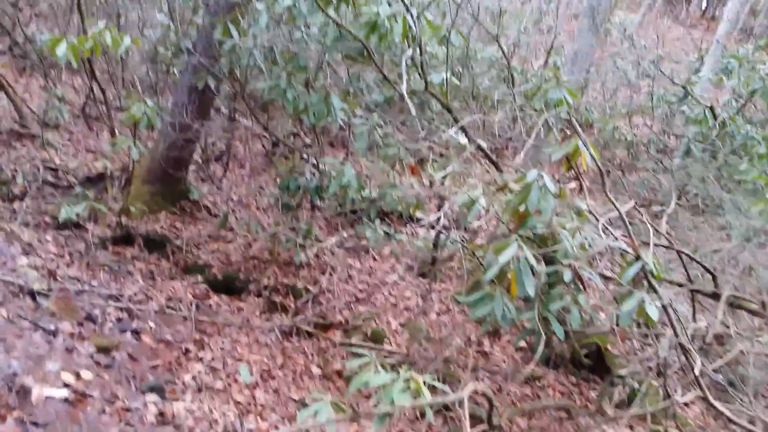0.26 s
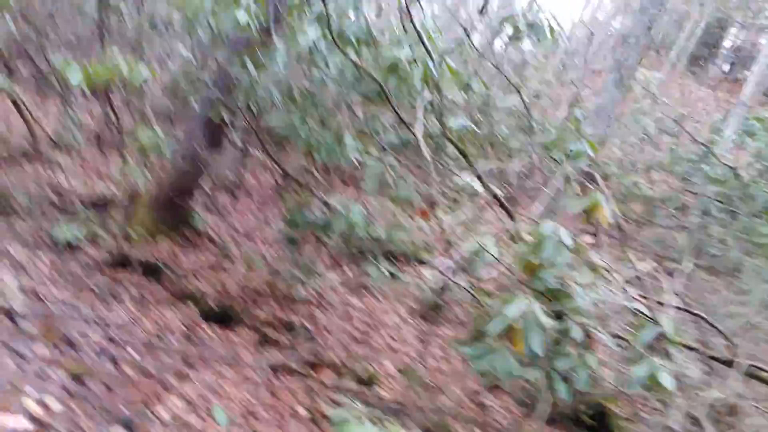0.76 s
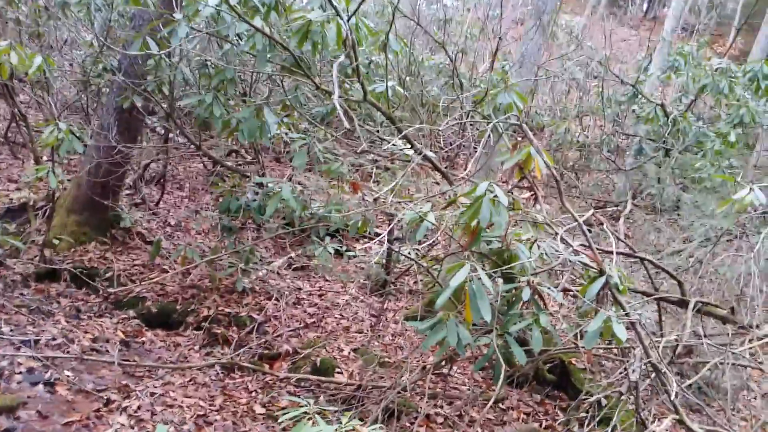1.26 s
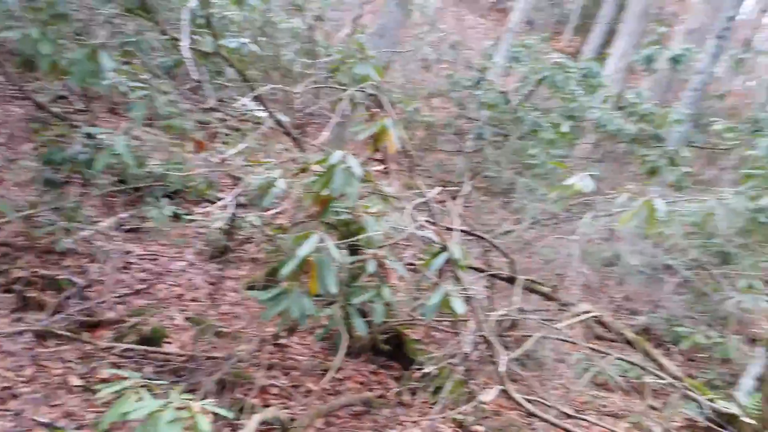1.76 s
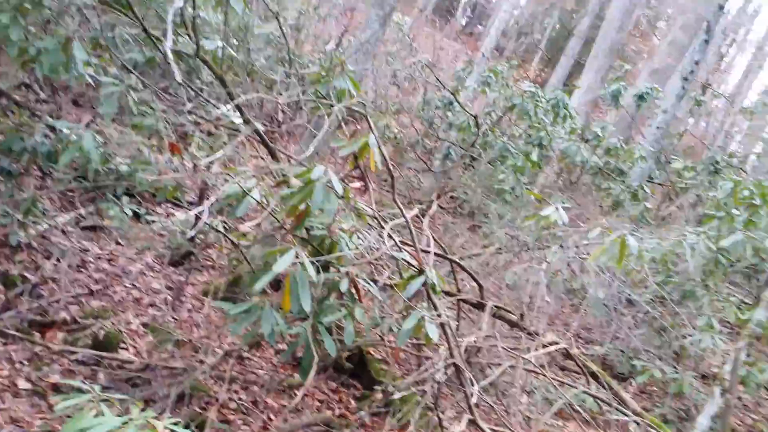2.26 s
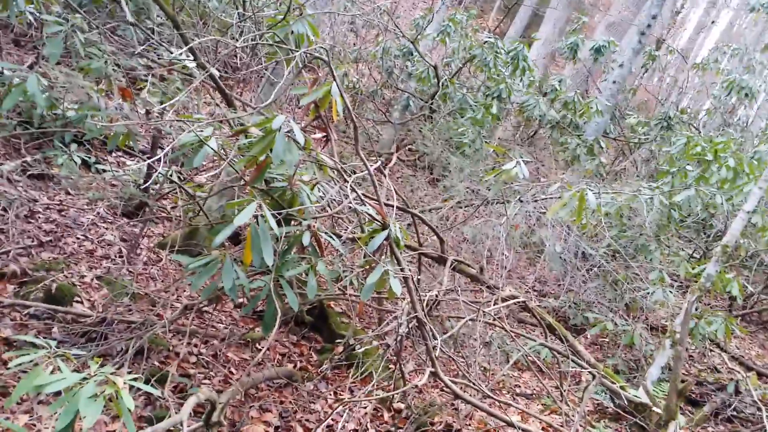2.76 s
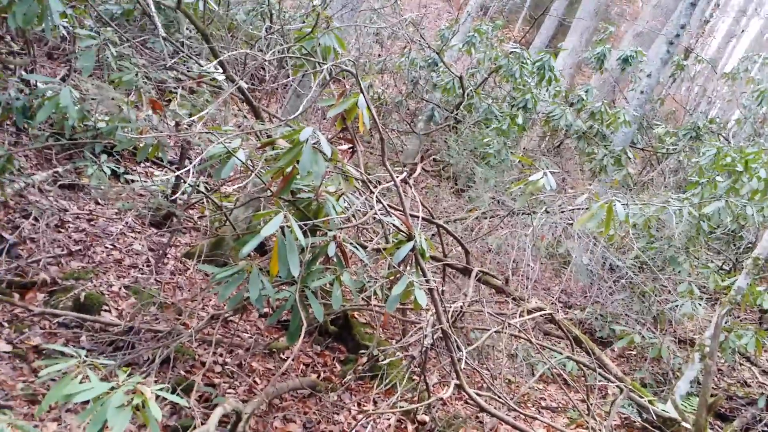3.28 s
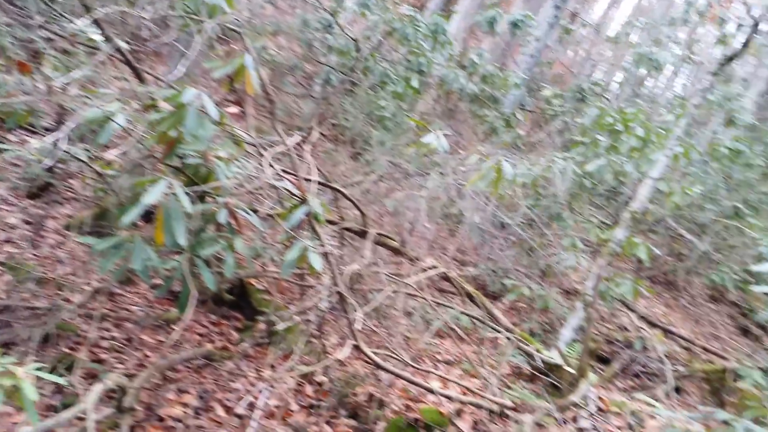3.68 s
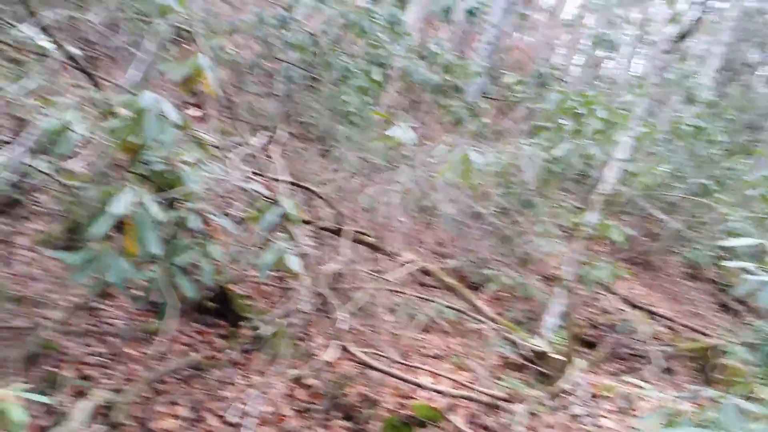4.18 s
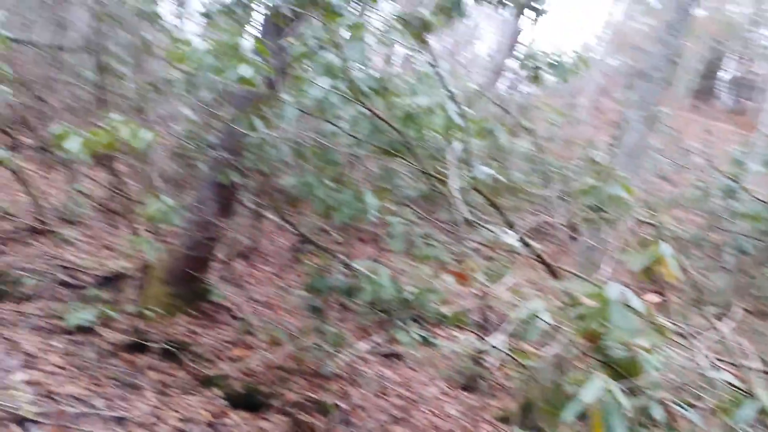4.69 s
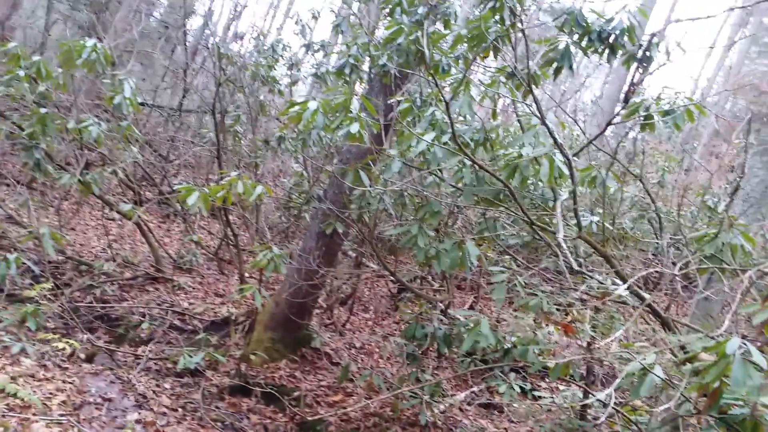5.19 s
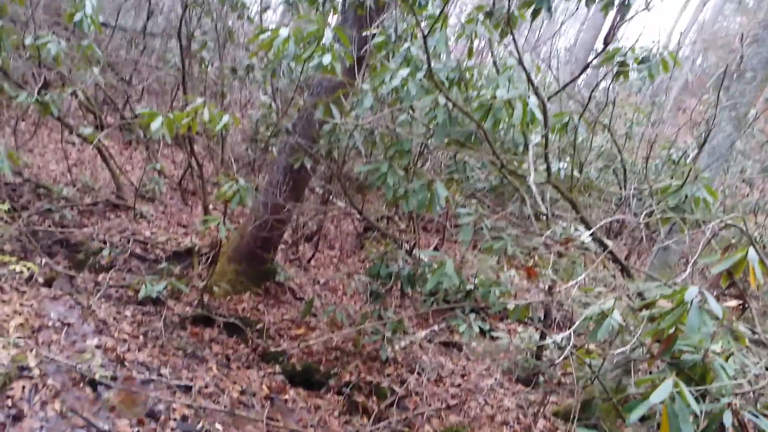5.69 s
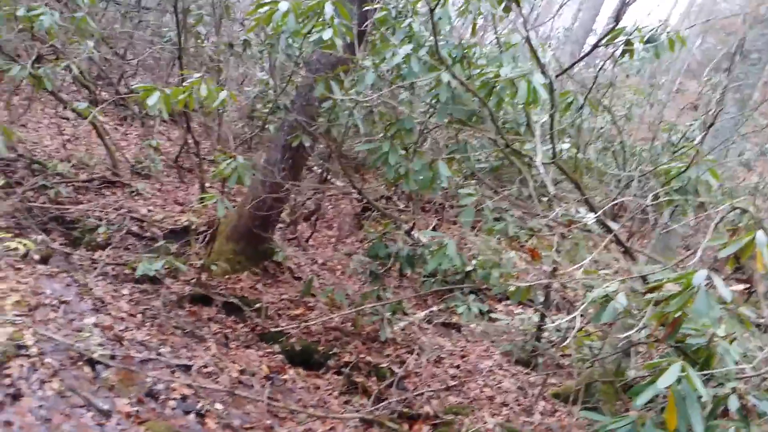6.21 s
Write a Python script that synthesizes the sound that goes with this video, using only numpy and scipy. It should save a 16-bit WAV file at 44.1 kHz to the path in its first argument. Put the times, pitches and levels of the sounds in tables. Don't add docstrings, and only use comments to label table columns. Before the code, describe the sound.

Dry leaves swish and crunch underfoot as twigs snap, three thick sticks crack loudly, and a faint aircraft drone swells late over soft hiss.

```python
import sys
import numpy as np
from scipy import signal
from scipy.fft import rfft, irfft, next_fast_len
from scipy.io import wavfile
from scipy.ndimage import uniform_filter1d, map_coordinates

SR = 44100
rng = np.random.default_rng(int(sys.argv[2]) if len(sys.argv) > 2 else 0)


def generate_wav(sig):
    pcm = np.round(np.clip(np.atleast_2d(sig).T, -1, 1) * 32767).astype(np.int16)
    wavfile.write(sys.argv[1], SR, pcm)


def to_linear_factor(level_db):
    exponent = np.asarray(level_db, float) / 20
    return 10 ** exponent


N = 284451

# freq_hz, density_db
HISS_LEFT = [(300, -8), (800, -13), (2200, -15.5), (4500, -17.5), (6000, -8.5), (7300, 0.5), (8500, -7),
             (10000, -8.5), (12000, -17.5), (15400, -16), (15900, -60)]
HISS_RIGHT = [(300, -3.5), (800, -5.5), (1500, -10), (2200, -11.5), (4500, -13), (6200, -22), (8500, -10.5),
              (10500, -16.5), (15400, -15), (15900, -66)]
# time_s, level_db, upper_drone_tilt_db, middle_drone_lean_db
DRONE = [(0.0, -49.5, 2.5, 0.5), (0.3, -45.5, -6, 5), (0.56, -47, 1, -1), (0.8, -53.5, 1.5, 6),
         (1.15, -63, 11, -0.5), (1.3, -56, 7, -2), (1.5, -61.5, 4, 4), (1.8, -58.5, 3.5, 0),
         (2.5, -62, 1, -1.5), (3.0, -57.5, -4.5, 4.5), (3.45, -53.5, -3, -3), (3.9, -57.5, -1.5, -0.5),
         (4.3, -54.5, -0.5, -1), (4.85, -53.5, 2, -4.5), (5.05, -48, -5.5, -13.5), (5.55, -42, -9, -1.5),
         (5.85, -43.5, -8.5, -6), (6.25, -47, 0.5, -8.5)]
# freq_hz, density_db
LOW_DRONE = [(35, -46), (60, -44), (102, 0.5), (124, 2.5), (145, -2.5), (190, -23.5), (300, -120)]
MID_DRONE = [(80, -62), (125, -20), (150, -2), (180, 0), (264, -19.5), (300, -13.5), (390, -53),
             (660, -120)]
HIGH_DRONE = [(130, -19), (220, 3.5), (242, 1), (270, -8.5), (301, 1), (325, 1), (350, -1.5), (404, -12.5),
              (454, -7), (520, -19.5), (900, -29), (1170, -54), (1980, -120)]
# freq_hz, density_db
GROUND_THUD = [(20, -45), (38, -13), (55, 6), (85, 15.5), (110, -36)]
# start_s, level_db
THUMPS = [
    (0.43, -66),
    (0.79, -41.5),
    (4.83, -55),
    (5.03, -46.5),
    (5.69, -60),
    (5.89, -60),
    (6.11, -64),
]
# start_s, peak_db, pitch_hz
KNOCKS = [(0.024, -14.5, 342), (0.0235, -20, 562), (0.622, -30.5, 268), (0.993, -35, 470),
          (2.204, -32.5, 700), (2.4245, -21.5, 780), (3.182, -46, 248), (3.299, -26, 456), (3.43, -42, 250),
          (3.491, -40, 335), (4.344, -60, 301), (5.084, -34.5, 316), (5.4152, -45, 1090), (5.527, -32, 252)]
# start_s, peak_db, pitch_hz
TICKS = [(0.161, -52, 1370), (0.226, -47, 1020), (1.554, -51, 1300), (1.651, -46, 1170),
         (1.3237, -36, 4590), (2.5466, -57, 5400), (2.574, -51.5, 3000), (2.6579, -55, 1980),
         (2.7624, -56, 4880), (2.795, -61, 2540), (2.983, -54.5, 2920), (3.0214, -59, 834),
         (3.0657, -56, 3840), (3.1248, -52, 2290), (3.1832, -57, 1230), (3.222, -56, 2880),
         (3.359, -47, 8500), (3.414, -57, 1100), (3.466, -57, 3720), (3.488, -49, 1150),
         (3.6004, -69, 1660), (3.6894, -56, 5370), (3.8504, -65, 1030), (3.888, -58, 2860),
         (4.341, -54, 1260), (4.9541, -60, 1020), (5.0664, -63, 912), (5.081, -48, 970), (5.675, -53, 1970),
         (6.354, -56, 4570)]
# start_s, peak_db, centre_hz, left_right_db
POPS = [(0.053, -33, 895, 5), (0.081, -36, 895, 2), (0.1108, -33.5, 910, 4), (0.195, -35, 7500, 4),
        (0.207, -39, 1500, 2), (0.3561, -48, 5000, 1), (0.5352, -58, 4000, 1), (0.622, -40.5, 934, 3),
        (0.6764, -44, 1500, 2.5), (0.6898, -34, 5000, 2.5), (0.711, -33, 5530, 3.5), (0.728, -31, 5600, 3),
        (0.765, -37, 1500, 10), (0.9238, -37.5, 1460, 2), (0.931, -39.5, 1410, 4), (0.948, -46, 1000, 4),
        (0.9926, -35, 6200, 2.5), (1.0565, -43, 964, -1), (1.1185, -36, 690, -3), (1.2216, -40, 1290, 4.5),
        (1.2235, -43, 4700, 4), (1.251, -43, 1600, 1), (1.312, -44, 4500, 3), (1.336, -39, 1100, 11),
        (1.362, -46, 1100, 5), (1.784, -36, 2000, 0), (1.785, -37, 1100, 5), (1.805, -37, 8000, 3),
        (1.835, -37.5, 800, 5), (1.8636, -29, 8750, 1), (1.8645, -31, 2180, 8), (1.866, -37, 12500, 3),
        (1.878, -45, 2000, 3), (1.935, -47, 2500, 3), (1.919, -32, 3890, 4), (4.772, -39, 4830, -2),
        (4.772, -49, 12000, 2), (5.4145, -38, 10000, 1), (5.421, -24, 4500, 3), (5.651, -48, 900, -3),
        (5.828, -45, 1300, 1), (5.837, -38.5, 600, 0), (6.071, -43, 1500, 2), (6.126, -43, 8500, 2),
        (1.952, -25.5, 13200, 13), (5.422, -22, 9500, -2), (5.4705, -30.5, 3200, 4),
        (6.108, -33.5, 4800, 3), (4.708, -40, 4000, 0), (2.204, -45, 1300, 4)]
# start_s, peak_db, centre_hz, left_right_db
SPECKS = [(0.163, -47, 3500, 3), (0.187, -44, 9000, 3), (0.202, -43, 4000, 3), (0.229, -41, 6000, 3),
          (0.059, -35, 10000, 3), (0.12, -36, 11000, 3), (0.901, -44, 8000, 3), (1.095, -44, 9000, 3),
          (1.327, -35, 7500, 4), (1.331, -41, 4600, 4), (1.832, -40, 13000, 3), (1.832, -38, 6000, 3),
          (1.838, -33, 4500, 3), (1.798, -37, 5000, 3), (2.012, -55, 1300, 2), (2.038, -54, 1200, 2),
          (2.054, -50, 2500, 2), (2.075, -47, 5000, 4), (2.115, -50, 5000, 2), (2.277, -50, 3000, 2),
          (2.665, -49, 2600, 2), (2.733, -47, 4800, 3), (2.796, -56, 1950, 2), (3.075, -52, 745, 1),
          (3.135, -53, 1300, 2), (3.214, -52, 3300, 2), (3.503, -48, 1290, 2), (3.571, -49, 3800, 2),
          (4.437, -56, 1200, 1), (4.688, -50, 2000, -2), (4.709, -44, 900, -2), (4.716, -50, 4500, 0),
          (4.955, -49, 2500, -2), (5.427, -29, 11000, 0), (5.433, -33, 9000, -3), (5.534, -44, 2900, 0),
          (5.684, -52, 2500, 1), (5.69, -49, 2050, 1), (5.743, -50, 1250, 1), (5.813, -52, 3000, -5),
          (6.019, -45, 3100, 2), (6.047, -38.5, 1100, 2), (6.06, -43, 3200, 2), (6.125, -46, 5500, 2),
          (6.235, -39, 3200, 2), (6.288, -45, 3000, 2), (6.355, -39, 3600, 3), (6.315, -43, 4500, 2),
          (0.0235, -30, 1080, 3), (0.1115, -23, 13500, 0)]
# start_s, held_s, pressure_db, dryness_db
PRESSES = [(0.0, 0.019, -38, -2), (0.07, 0.14, -47, -7), (0.27, 0.14, -57, -9), (0.39, 0.22, -53, -9.5),
           (0.71, 0.021, -39, 1), (0.8, 0.1, -49.5, -7.5), (0.935, 0.26, -49, -5.5),
           (1.22, 0.14, -48.5, -3.5), (1.5, 0.095, -59.5, -5), (1.677, 0.046, -46.5, -4),
           (1.808, 0.0098, -43.5, -0.5), (1.87, 0.12, -54, -2.5), (2.06, 0.21, -64.5, -9),
           (2.26, 0.087, -61.5, -12.5), (2.36, 0.31, -67, -9), (2.75, 0.072, -64.5, -3),
           (3.38, 0.16, -60.5, -4.5), (3.6, 0.79, -71, -16), (4.69, .02, -59, -7), (4.9, 0.86, -66.5, -9),
           (5.49, 0.015, -61.5, 9), (5.56, 0.36, -63.5, -5), (6.0, 0.031, -53, -18.5),
           (6.04, 0.046, -46, -8.5), (6.13, 0.15, -54, -6), (6.25, 0.16, -52.5, -9)]
# freq_hz, density_db
LEAF_BODY = [(250, -18), (600, -6.5), (1200, -2), (2200, -5.5), (3500, -5), (4800, -5.5), (7000, -19.5)]
LEAF_EDGE = [(3500, -5), (5400, -0.5), (7600, 3.5), (10000, -0.5), (13000, -5), (15400, -5), (15900, -43)]
MOULD = [(250, -10), (500, 10.5), (1200, 1), (2500, -14), (4500, -41)]
# freq_hz, gain_db
FLICK_BAND = [(300, -20), (600, 0), (15300, 0), (15800, -50)]
# freq_hz, level_db, t60_s
BRUSH = [(400, 13, 0.072), (2110, 15.5, 0.029), (7630, -2, 0.14), (14000, 6.5, 0.14), (15800, 8, 0.093),
         (15900, -9, .05)]
# time_s, left_port_lag_ms
BEARING = [(0, 0), (1.1, -.16), (1.44, .06), (1.78, -.25), (2.43, -.2), (3.3, .04), (4.7, .28), (5.3, .25),
           (5.42, .08), (5.46, -.1), (5.84, -.09)]
# start_s, peak_db, pitch_hz, left_right_db
BRITTLE = [(0.053, -51, 6000, 0.0), (0.062, -31, 7850, -16), (0.0764, -28.5, 8000, 13),
           (0.108, -32, 9000, -15), (0.111, -23.5, 7440, 11), (0.1185, -38, 5200, -9),
           (0.8784, -45, 1400, 0), (0.924, -36, 7200, -11.5), (0.9924, -36, 574, -5),
           (1.085, -39.5, 1380, 5), (1.678, -36, 7450, 1), (1.7035, -32, 3520, 11), (1.783, -20.5, 6840, 8),
           (1.8644, -24.5, 3900, 9.5), (1.8695, -24, 3660, 5), (1.9176, -30.5, 7460, 10),
           (2.1301, -44, 6960, 12), (3.4274, -44, 2470, -1), (3.57, -40, 7360, 9), (4.3882, -47, 7400, -3),
           (4.6861, -46, 4800, -4), (4.7076, -41, 3000, -6)]
# start_s, peak_db, pitch_hz, left_right_db
DAMP = [(0.0228, -19.5, 4600, 10), (0.8106, -30, 8020, 4), (1.1179, -24, 5300, 9.5), (1.243, -30, 1280, 6),
        (1.3237, -37, 4800, 16), (1.8092, -21, 2500, 4.5), (2.004, -38, 3800, 2), (2.2035, -35.5, 4230, 8),
        (2.6217, -44, 7400, 2), (2.732, -45, 7560, 13), (3.1219, -46, 2350, 2), (4.4254, -40, 6850, 3),
        (4.771, -31.5, 1520, 2.5), (5.5314, -40.5, 1800, -1), (6.1074, -36, 4600, 13),
        (6.1644, -38, 4800, 3), (6.2342, -44, 1330, -4), (6.355, -37, 4700, 12)]
# start_s, peak_db, left_right_db, scatter_db, suddenness (first break over tearing)
STICKS = [
    (1.4416, -5, 3.5, -14.5, 7.2),
    (1.952, -18.5, 4, -8.5, 6.2),
    (2.4233, -25, 5, -20, 13),
    (3.2961, -7.5, 7.5, -12, 3.8),
    (5.416, -8.5, 1.5, -14, 6.5),
    (5.469, -16.5, 0, -8, 2.3),
    (5.836, -23.5, 3.5, -17, 6.5),
]
# freq_hz, density_db
STICK_VOICES = [
    [(150, -45), (250, -13.5), (1300, -13), (1800, -5.5), (3350, 1.5), (4670, -13), (7900, 0.5),
     (10600, -17), (15100, -8.5), (16500, -21)],
    [(240, -42), (400, -18), (971, 1), (1900, -8), (4070, -0.5), (8720, -6.5), (11000, -22), (13700, -20),
     (16500, -27)],
    [(150, -27), (350, 2), (700, -8), (1100, -22), (1600, -1), (2300, -17), (3900, -7.5), (5500, -25),
     (7900, -26), (16500, -60)],
    [(150, -40), (250, -6), (600, -8), (1020, -5.5), (2650, -12.5), (5760, -12), (7240, -4), (9500, -0.5),
     (11600, 1), (14900, -9), (16500, -32)],
    [(180, -38), (500, -8), (1450, 0), (3710, -7.5), (5500, -9.5), (7630, 1), (9490, -22), (13000, -12),
     (16500, -32)],
    [(180, -37), (300, -1.5), (650, 1), (1000, -5), (1450, -4), (3300, -21), (6560, -7), (13000, -25),
     (15400, -17), (16500, -50)],
    [(240, -36), (800, -12), (1390, -3.5), (4400, -19), (5600, -19), (7010, -6.5), (12500, -29),
     (13900, -10), (16500, -39)],
]
# freq_hz, gain_db
LEFT_PORT = [(4500, 0), (5800, 0.5), (7200, 1.5), (9200, -3.5), (12000, 0.5), (14500, 0.5)]
# freq_hz, gain_db
PASS_BAND = [(22, -18), (45, 0), (15400, 0), (15800, -15), (16500, -24), (16800, -60)]

PRESS_RISE_DB_S, PRESS_FALL_DB_S, REST_DB, REST_EDGE_DB = 361, 239, -69.5, -74
DEBRIS_DB, DEBRIS_EDGE_DB, DEBRIS_LATE_S = -53, -33, 0.002
DEBRIS_RISE_DB_S, DEBRIS_FALL_DB_S, DEBRIS_GROWS = 12000, 304, 1.3
MOULD_DB, MOULD_PER_DRY = -14.5, -0.79


def along(points, hz):
    f, v = np.transpose(points)
    return np.interp(np.log(hz + 1), np.log(f + 1), v)


def unit(x):
    return x / np.sqrt(np.mean(x ** 2) + 1e-20)


def curves(rows):
    s, *cols = np.transpose(rows)
    return [np.interp(np.arange(N) / SR, s, c) for c in cols]


def wobble(rate_hz):
    return map_coordinates(rng.standard_normal(int(N * rate_hz / SR) + 4), [np.arange(N) * rate_hz / SR])


def coloured(x, spectrum):
    m = next_fast_len(N + 8192)
    gain = to_linear_factor(along(spectrum, np.fft.rfftfreq(m, 1 / SR)))
    return unit(irfft(rfft(x, m) * gain, m)[..., :N])


def pair(alike):
    a, b = rng.standard_normal((2, N))
    turn = np.arccos(np.clip(alike, -1, 1)) / 2
    return np.array([np.cos(turn) * a + np.sin(turn) * b, np.cos(turn) * a - np.sin(turn) * b])


def band(x, lo_hz, hi_hz):
    y = signal.sosfilt(signal.butter(2, [lo_hz, hi_hz], "band", fs=SR, output="sos"), x)
    return y / np.abs(y).max()


def add(track, s, sound):
    start = round(s * SR)
    track[..., start:start + sound.shape[-1]] += sound


def sides(left_right_db):
    return np.array([[left_right_db / 2], [-left_right_db / 2]])


def fringed(x, depth_db, size=4096):
    z = signal.stft(x, nperseg=size)[2]
    field = uniform_filter1d(rng.standard_normal(z.shape[1:]), size=3, axis=0)
    field = uniform_filter1d(field, size=5, axis=1)
    return signal.istft(z * to_linear_factor(depth_db * unit(field)), nperseg=size)[1][:, :N]


def swell(start, held, db, rise_db_s, fall_db_s):
    t = np.arange(0, N + 32, 32) / SR
    rise = rise_db_s * np.maximum(start - t, 0)
    fall = fall_db_s * np.maximum(t - start - held, 0)
    return to_linear_factor(2 * (db - rise - fall))


def level(power):
    return np.sqrt(np.interp(np.arange(N) / 32, np.arange(len(power)), power))


def hiss():
    stir_db = -55.5 + 0.24 * (curves(DRONE)[0] + 55)
    left = to_linear_factor(stir_db) * coloured(rng.standard_normal(N), HISS_LEFT)
    right = to_linear_factor(-62) * coloured(rng.standard_normal(N), HISS_RIGHT)
    return np.array([left, right])


def aircraft():
    low_db, tilt_db, lean_db = curves(DRONE)
    air = fringed(pair(0.98), depth_db=2.0)
    low = coloured(air, LOW_DRONE) + to_linear_factor(lean_db) * coloured(air, MID_DRONE)
    low = to_linear_factor(low_db + 1.96 * wobble(6.4)) * low
    high = coloured(fringed(pair(0.88), depth_db=2.5), HIGH_DRONE)
    high = to_linear_factor(low_db + tilt_db + 1.87 * wobble(11)) * high
    rumble = to_linear_factor(low_db - 15.5) * coloured(pair(0.94), GROUND_THUD)
    return low + high + rumble


def thumps():
    power = sum(swell(s, 0, db, rise_db_s=118, fall_db_s=118) for s, db in THUMPS)
    return level(power) * coloured(pair(0.16), GROUND_THUD) * to_linear_factor(sides(-3))


def knocks():
    out, t = np.zeros(N + SR), np.arange(SR // 30) / SR
    for s, db, hz in KNOCKS:
        decay = to_linear_factor(db + 2.0 - 60 * t * hz / 7)
        add(out, s, decay * np.sin(2 * np.pi * hz * t) * (1 - np.exp(-t / 0.0011)))
    return out[:N]


def ticks():
    out, t = np.zeros((2, N + SR)), np.arange(SR // 50) / SR
    for s, db, hz in TICKS:
        shiver = rng.standard_normal((2, len(t))) * to_linear_factor(-60 * t / 0.027)
        shiver = band(shiver, hz * 0.9, hz * 1.5)
        ring = np.sin(2 * np.pi * hz * t) * to_linear_factor(-60 * t / 0.035) * (1 - np.exp(-t / 0.00049))
        add(out, s, to_linear_factor(db + 5.5) * (0.52 * shiver + 0.5 * ring))
    return out[:, :N]


def fibres(break_size, t60):
    tear = rng.standard_normal((2, 1024)) * to_linear_factor(-60 * np.arange(1024) / SR / t60)
    tear[1] = tear[0] + 1.17 * tear[1]
    tear -= 0.076 * uniform_filter1d(tear, size=21, axis=1)
    tear[:, 3] += break_size
    return tear


def pops():
    out, span = np.zeros((2, N + SR)), 1.29
    for table, t60 in ((POPS, 0.015), (SPECKS, 0.013)):
        for s, db, hz, pan_db in table:
            pop = band(fibres(break_size=4.1, t60=t60), hz / span, min(hz * span, .45 * SR))
            add(out, s, to_linear_factor(db + sides(pan_db)) * pop)
    return out[:, :N]


def crackle(per_s, life_s, spread_db):
    breaks = (rng.random(N) < per_s / SR) * to_linear_factor(spread_db * rng.exponential(size=N))
    return unit(signal.lfilter([1], [1, -np.exp(-1 / (life_s * SR))], breaks))


def grains(per_s, pitch_hz, cycles, spread_db):
    draw = rng.standard_normal((int(per_s * N / SR), 4))
    start = np.sort(rng.integers(0, N, len(draw)))
    t = np.arange(200) / SR
    hz = np.clip(pitch_hz * np.exp(0.695 * draw[:, :1]), 500, 14000)
    size = to_linear_factor(spread_db * np.abs(draw[:, 1:2]))
    ring = size * np.sin(2 * np.pi * hz * t) * np.exp(-t * hz / cycles)
    place = start[:, None] + np.arange(len(t))
    lag = (20 + 8 * np.clip(draw[:, 2:3], -2, 2)).astype(int)
    side = to_linear_factor(2 * draw[:, 3:])
    left = np.bincount((place + 20).ravel(), (ring * side).ravel())
    right = np.bincount((place + lag).ravel(), (ring / side).ravel())
    return unit(np.array([np.pad(x, (0, N))[:N] for x in (left, right)]))


def pressed(rest_db, per_dry):
    return sum(swell(s, held, rest_db + db + per_dry * dry, PRESS_RISE_DB_S, PRESS_FALL_DB_S)
               for s, held, db, dry in PRESSES)


def debris(db):
    return sum(swell(s + DEBRIS_LATE_S, 0, DEBRIS_GROWS * (peak + 8) - 8 + db,
                     DEBRIS_RISE_DB_S, DEBRIS_FALL_DB_S) for s, peak, *_ in STICKS)


def leaves():
    crush = level(to_linear_factor(2 * REST_DB) + debris(DEBRIS_DB) + pressed(0, per_dry=0))
    bright = level(to_linear_factor(2 * REST_EDGE_DB) + debris(DEBRIS_EDGE_DB) + pressed(0, per_dry=1))
    damp = level(pressed(MOULD_DB, MOULD_PER_DRY))
    grain = .8 + .42 * crackle(per_s=500, life_s=.0015, spread_db=2.1)
    flicks = grains(per_s=1100, pitch_hz=3000, cycles=14.0, spread_db=0.0)
    body = coloured(grain * pair(0.018), LEAF_BODY) + 0.61 * coloured(flicks, FLICK_BAND)
    edge = coloured(grain * pair(0.024), LEAF_EDGE)
    mould = coloured(grain * pair(0.29), MOULD)
    rustle = to_linear_factor(-3.5) * crush * body + to_linear_factor(3.5) * bright * edge + damp * mould
    return rustle * to_linear_factor(sides(2.6) + 1.04 * wobble(30))


def brush(size):
    hz, t, z = signal.stft(rng.standard_normal((2, size)), SR, nperseg=128)
    f, db, t60 = np.transpose(BRUSH)
    start_db = along(np.c_[f, db], hz)[:, None]
    fade = to_linear_factor(start_db - 60 * t / along(np.c_[f, t60], hz)[:, None])
    tail = signal.istft(z * fade, SR, nperseg=128)[1][:, :size]
    tail = tail * np.clip((np.arange(size) / SR - .0035) / .002, .12, 1)
    return tail / np.linalg.norm(tail[0])


def placed(out, s, snap, paler, pan_db, scatter_db):
    scatter = to_linear_factor(scatter_db) * signal.fftconvolve(paler, brush(size=6000), axes=1)
    side_db = sides(pan_db)
    heard = np.pad(snap, ((0, 0), (0, 5999))) * to_linear_factor(side_db) + scatter * to_linear_factor(0.21 * side_db)
    late = np.interp(s, *np.transpose(BEARING)) / 2000
    add(out[0], s + late, heard[0])
    add(out[1], s - late, heard[1])


def twigs():
    out, t = np.zeros((2, N + SR)), np.arange(1024) / SR
    for table, crack_db in ((BRITTLE, -11), (DAMP, -30)):
        for s, db, hz, pan_db in table:
            tear = fibres(break_size=1.9, t60=0.015)
            ring = np.sin(2 * np.pi * hz * t) * to_linear_factor(-60 * t * hz / 18) * (1 - np.exp(-t / 0.000054))
            knock = band(rng.standard_normal(len(t)) * to_linear_factor(-60 * t / 0.026), 340, 1540)
            knock_db = -10 - 4.5 * np.log2(hz / 1000)
            crack = to_linear_factor(crack_db + 5.0) * band(tear, 4900, 12400)
            snap = 0.64 * band(tear, 2340, 8800) + 0.72 * ring + crack + to_linear_factor(knock_db) * knock
            snap = to_linear_factor(db + 2.5) * snap
            placed(out, s + 0.00065, snap, snap, pan_db, scatter_db=-14)
    return out[:, :N]


def impulse(spectrum, size):
    cep = irfft(np.log(to_linear_factor(along(spectrum, np.fft.rfftfreq(size, 1 / SR))) + 1e-4))
    cep[1:size // 2] *= 2
    cep[size // 2 + 1:] = 0
    return irfft(np.exp(rfft(cep)))


def flat(x):
    z = rfft(x, 4096)
    return irfft(z / np.sqrt(uniform_filter1d(np.abs(z) ** 2, size=60, axis=1)))[:, :x.shape[1]]


def sticks():
    out = np.zeros((2, N + SR))
    for (s, db, pan_db, scatter_db, sudden), voice in zip(STICKS, STICK_VOICES):
        tear = flat(fibres(-sudden, t60=0.0048 + 0.021 / sudden))
        snap = signal.fftconvolve(tear, impulse(voice, size=1024)[None], axes=1)[:, :1024]
        snap *= to_linear_factor(db + 10.5) / np.linalg.norm(snap[0])
        paler = impulse([(hz, 0.63 * voice_db) for hz, voice_db in voice], size=1024)
        paler = np.linalg.norm(snap[0]) * paler[None] / np.linalg.norm(paler)
        placed(out, s + .0013, snap, paler, pan_db, scatter_db)
    return out[:, :N]


def ports(x):
    m = next_fast_len(N + 8192)
    hz, z = np.fft.rfftfreq(m, 1 / SR), rfft(x, m)
    shared = 1 / (1 + (hz / 440) ** 2)
    z = shared * z.mean(axis=0) + (1 - shared) * z
    return irfft(z * to_linear_factor(along(LEFT_PORT, hz) * [[1], [-1]]), m)[:, :N]


def scene():
    air = hiss() + aircraft() + thumps()
    rustle = to_linear_factor(-0.6) * fringed(leaves(), depth_db=2.0, size=256)
    wood = knocks() + ticks() + pops() + twigs() + sticks()
    return ports(wood + rustle) + air


def low_pass(x):
    return signal.sosfilt(signal.butter(12, 16870, fs=SR, output="sos"), x)


def record(dry):
    m = next_fast_len(N + 8192)
    gain = to_linear_factor(along(PASS_BAND, np.fft.rfftfreq(m, 1 / SR)))
    cut = irfft(rfft(dry, m) * gain, m)[:, :N]
    rounded = cut / (1 + np.abs(cut / .82) ** 6) ** (1 / 6)
    return low_pass(rounded - .0004)


dry = scene()
out = record(dry)
generate_wav(out)
```